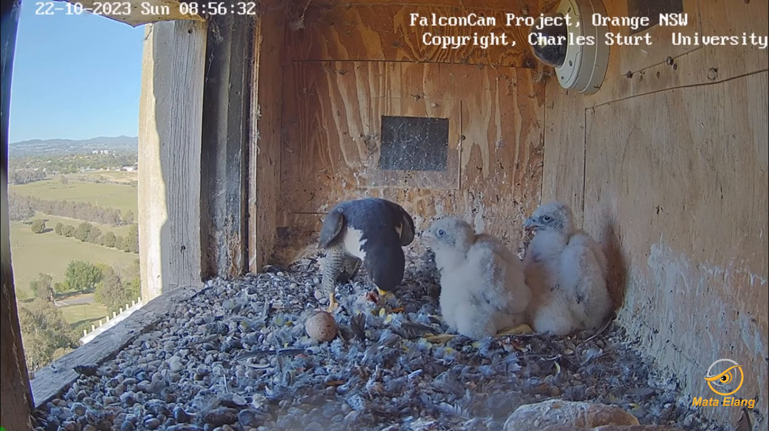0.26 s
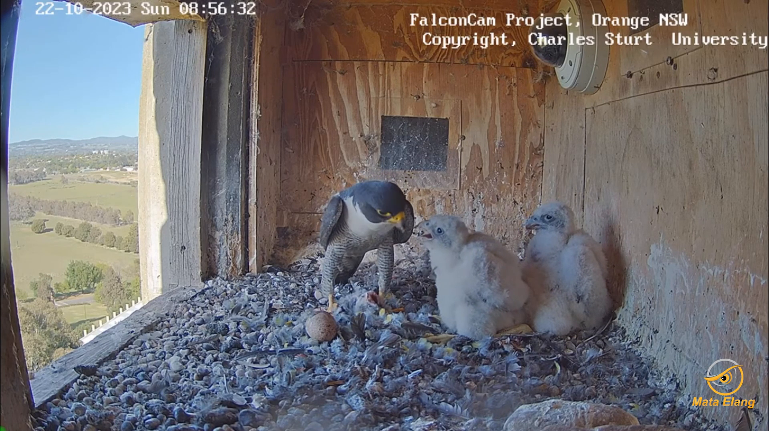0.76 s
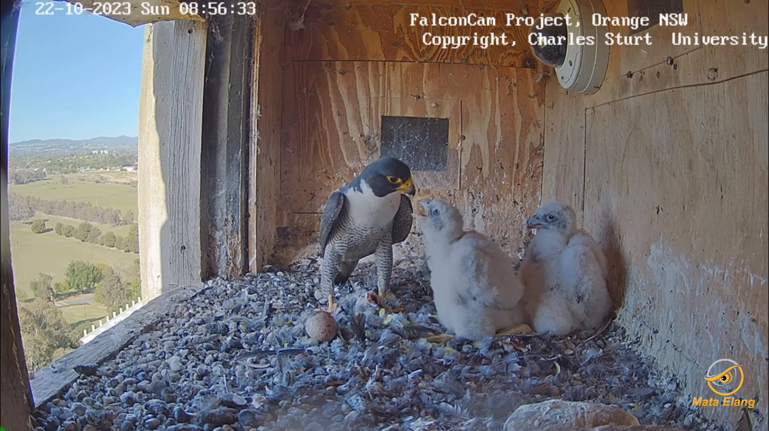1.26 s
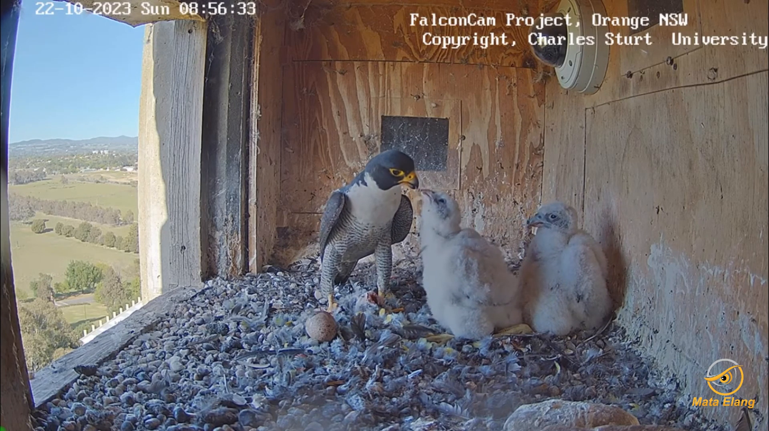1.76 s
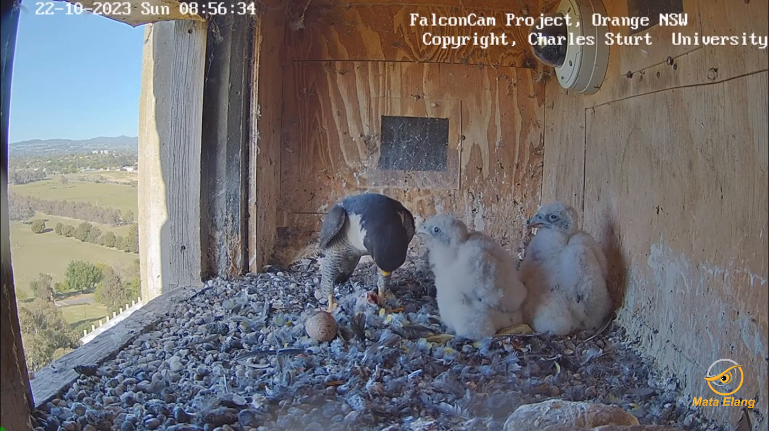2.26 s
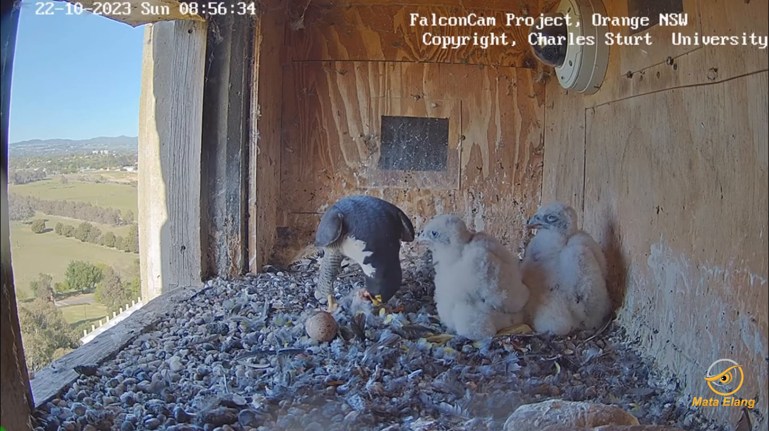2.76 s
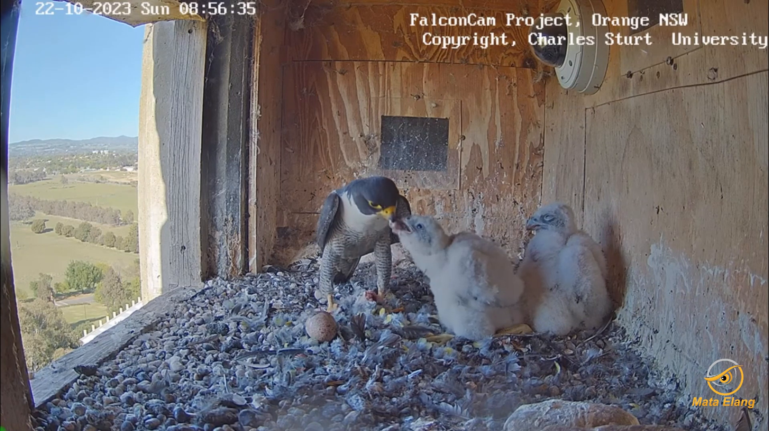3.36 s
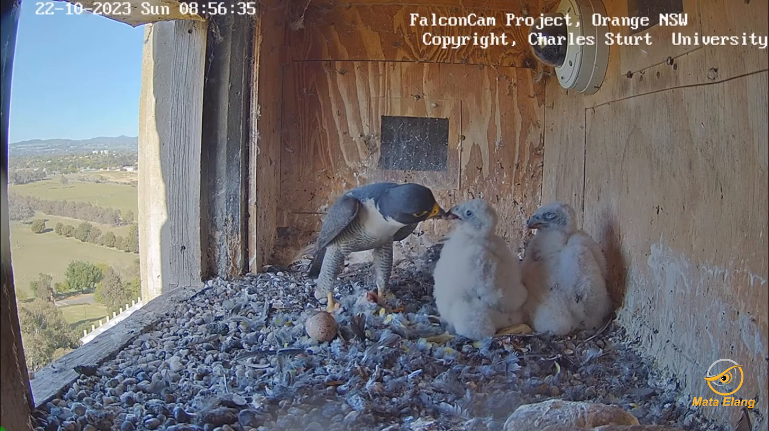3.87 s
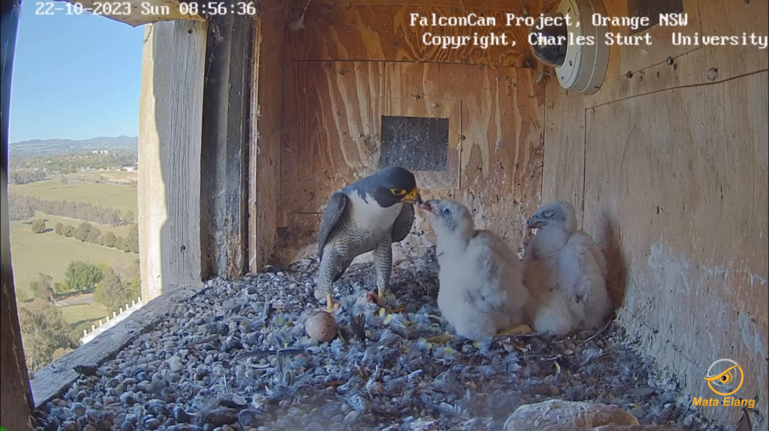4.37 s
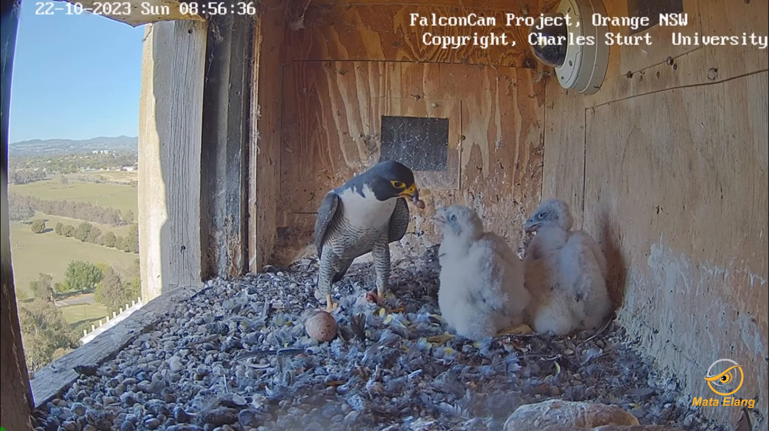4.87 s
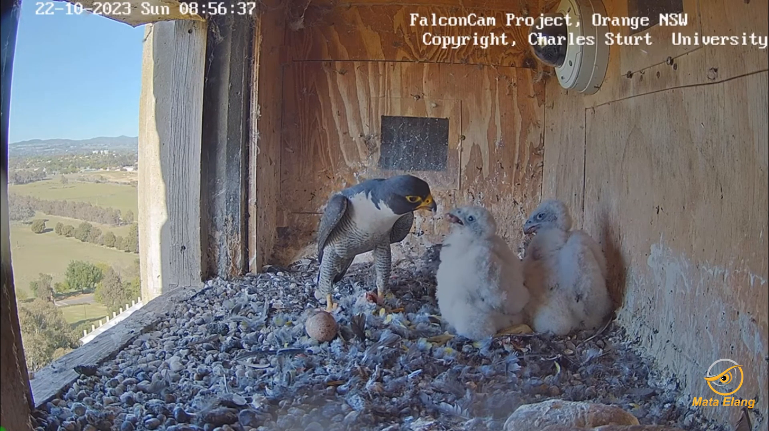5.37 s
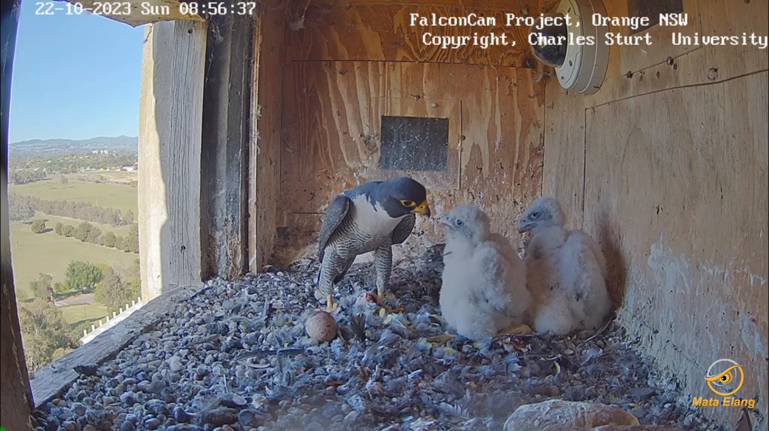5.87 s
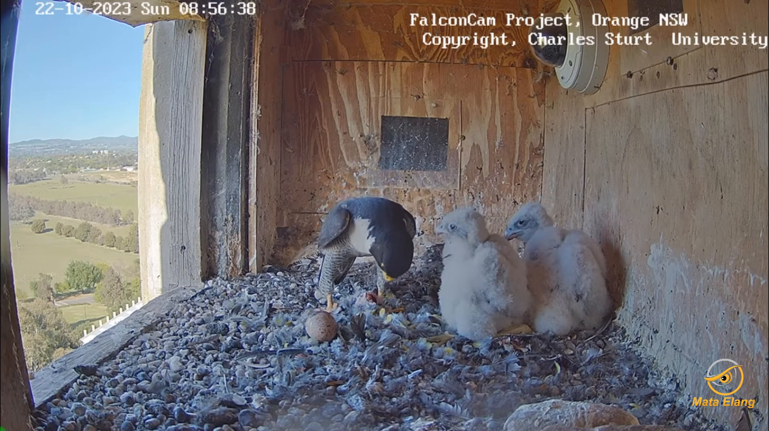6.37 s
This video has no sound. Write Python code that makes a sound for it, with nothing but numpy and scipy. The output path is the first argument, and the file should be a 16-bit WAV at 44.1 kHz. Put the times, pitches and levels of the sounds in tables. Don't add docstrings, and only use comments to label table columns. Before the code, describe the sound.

Falcon chicks beg inside a box on a hollow concrete tower. One deep thud sets the air rumbling, overlapped by a clear, nasal, whistling whine. Later calls grow busier: soft chups, bright yelps, a rough high squeal and a high unsteady whine, a sibling briefly overlapping. Beaks and claws tick on gravel. The slightly dull close microphone adds faint hiss and hum, and the calls ring on.

```python
import sys
import numpy as np
from scipy import signal
from scipy.fft import rfft, irfft
from scipy.io import wavfile
from scipy.ndimage import uniform_filter1d

SR = 44100
rng = np.random.default_rng(int(sys.argv[2]) if len(sys.argv) > 2 else 0)


def boost_factor(decibels):
    exponent = np.asarray(decibels, float) / 20
    return 10 ** exponent


def master_out(mix):
    frames = np.transpose(np.atleast_2d(mix))
    ceiling = np.clip(frames, -1, 1)
    pcm = np.round(ceiling * 32767).astype(np.int16)
    wavfile.write(sys.argv[1], SR, pcm)


N = 292206
SHIMMER_DB, FLUTTER_DB = 1.3, 2.2


def band(x, hz, width):
    return signal.lfilter(*signal.iirpeak(hz, hz / width, fs=SR), x)


def walk(rate, count=N):
    k = int(SR / rate)
    x = rng.standard_normal(count + 2 * k)
    x = uniform_filter1d(uniform_filter1d(x, k), k)[k:-k]
    return x / x.std()


def dying(t, t60):
    return np.exp(-np.log(1000) * t / t60)


def call(table, above_db, jitter, shimmer_db, breath_db):
    s, hz, *partials_db = np.transpose(table)
    at = np.arange(int(s[0] * SR), int(s[-1] * SR))
    count = len(at)
    closed_db = -18 * np.exp(-(s - s[0]) / 0.045)
    partials_db += [partials_db[-1] + db + closed_db for db in above_db]

    pitch = np.interp(at / SR, s, hz) * (1 + jitter * walk(158, count=SR)[:count])
    phase = 2 * np.pi * np.cumsum(pitch) / SR
    gains = [boost_factor(np.interp(at / SR, s, db)) for db in partials_db]
    tone = sum(g * np.sqrt(2) * np.sin((k + 1) * phase) for k, g in enumerate(gains))
    tone = tone * boost_factor(shimmer_db * walk(52, count=SR)[:count])

    air = band(band(rng.standard_normal(SR)[:count], 3500, 4200), 3100, 2000)
    breath = boost_factor(breath_db) * sum(gains) * air
    edges = np.clip(np.minimum(at - at[0], at[-1] - at) / (.008 * SR), 0, 1) ** 2
    out = np.zeros(N)
    out[at] = (tone + breath) * edges
    return out


def voiced(s, hz, db, partials_db, flutter_db):
    fine = np.append(np.arange(s[0], s[-1], .005), s[-1])
    at = ((fine - s[0]) * SR).astype(int)
    levels = []
    for k, partial_db in enumerate(partials_db):
        flutter = flutter_db * min(k + 1, 2) / 2 * walk(18, count=SR)[at]
        levels.append(np.interp(fine, s, db + partial_db) + flutter)
    return np.transpose([fine, np.interp(fine, s, hz), *levels])


def whine(curve, shut_db, open_db, top_db, rough):
    s, hz, db, beak = np.transpose(curve)
    db5, db6, db7 = top_db
    jitter, breath_db = rough
    partials_db = [shut + beak * (wide - shut) for shut, wide in zip(shut_db, open_db)]
    table = voiced(s, hz, db, partials_db, FLUTTER_DB)
    db7 = db7 + .9 * np.interp(table[:, 0], s, db - db.max())
    return call(table, (db5, db6, db7, db7), jitter, SHIMMER_DB, breath_db)


# (time [s], pitch [Hz], level [dB], beak opening [0-1])
WHINE_CURVES = [
    [(.762, 1014, -46, 0.2), (.78, 1135, -38, 0.64), (.835, 1061, -33.5, 0), (.92, 1102, -31.5, 0.07),
     (1.0, 1085, -28.5, 0.9), (1.34, 1084, -29.5, 0.54), (1.44, 1050, -26.5, 1), (1.55, 1031, -33.5, 0.86),
     (1.575, 958, -33.5, 0.4)],
    [(3.283, 1077, -38.5, 0.4), (3.325, 1172, -31, 0.8), (3.37, 1187, -24.5, 1), (3.40, 1233, -30, 0.4),
     (3.435, 1196, -34.5, 0.66), (3.52, 1147, -34.5, 1), (3.57, 1106, -36, .9), (3.605, 1130, -35, 0),
     (3.63, 1017, -35.5, .3)],
    [(4.994, 1143, -26, 0.77), (5.06, 1309, -34.5, 1), (5.085, 1250, -27.5, 0.96),
     (5.18, 1239, -33.5, 0.74), (5.23, 1320, -27.5, 0), (5.285, 1350, -27.5, 0.1),
     (5.315, 1170, -34.5, 0.01), (5.335, 1335, -36, 0.05), (5.39, 1380, -42, 0.2)],
]
# (time [s], pitch [Hz], level [dB], beak opening [0-1])
YAP_CURVE = [(4.081, 1065, -35.5, .5), (4.101, 1081, -32.5, 0.24), (4.12, 1147, -26.5, 0.9),
             (4.14, 1106, -32, 0.55), (4.161, 1151, -33.5, 0.08), (4.181, 1111, -39, 0)]
BEAK_SHUT = [(-13.5, -2, -6, -1), (-11, 2.5, -12, -9), (-34, -3, -22, -22.5), (-12, -0.5, -3, -3.5)]
BEAK_OPEN = [(-15.5, -7, 0, -11.5), (-15.5, -10, 0.0081, -8.5), (-12, -3.5, 0, -7.5),
             (-14, -9, 0.0057, -14.5)]
# (partial 5 [dB], partial 6 [dB], partials 7-8 [dB])
TOP_PARTIALS = [(-15.5, -32, -28), (-7, -24, 4), (-24, -7, -18), (-34, -36, -30)]
# (pitch jitter [share], breath [dB])
ROUGHNESS = [(.004, -25), (.005, -23), (.006, -20), (.0055, -18)]


def whines():
    voices = zip(WHINE_CURVES + [YAP_CURVE], BEAK_SHUT, BEAK_OPEN, TOP_PARTIALS, ROUGHNESS)
    return sum(whine(*voice) for voice in voices)


# (time [s], pitch [Hz], level [dB])
SQUEAL_CURVE = [(4.308, 2243, -33), (4.341, 2877, -28.5), (4.40, 3077, -27.5), (4.445, 2834, -28),
                (4.486, 2874, -28.5), (4.50, 2830, -40), (4.52, 2747, -36), (4.555, 2598, -33),
                (4.588, 1780, -48.5)]


def squeal():
    s, hz, db = np.transpose(SQUEAL_CURVE)
    second_db = -15 - 9 * (hz - 2800) / 1000
    second_db = second_db - 22 * np.exp(-(s - s[0]) / .02)
    table = voiced(s, hz, db, (0, second_db), FLUTTER_DB)
    return call(table, (), jitter=0.0058, shimmer_db=3.5, breath_db=-14.5)


def short(rows, partials_db, top_db, sag_db, jitter, breath_db):
    out = 0
    for s, length, db, first_hz, last_hz in rows:
        times = s + np.array([0, 0.01, length])
        hz = np.interp(times, times[::2], [first_hz, last_hz])
        levels_db = db + np.array([-12.5, 0, sag_db])
        table = voiced(times, hz, levels_db, partials_db, FLUTTER_DB / 2)
        out = out + call(table, top_db, jitter, SHIMMER_DB, breath_db)
    return out


# (time [s], length [s], level [dB], first pitch [Hz], last pitch [Hz])
YELP_CALLS = [
    (2.443, 0.045, -38.5, 1154, 1127),
    (3.017, 0.065, -38.5, 1087, 1246),
    (4.042, 0.038, -29.5, 1070, 1240),
    (4.928, 0.069, -32.5, 1044, 1241),
]
# (time [s], length [s], level [dB], first pitch [Hz], last pitch [Hz])
CHUP_CALLS = [
    (2.485, 0.067, -43.5, 1129, 1147),
    (3.078, 0.083, -41, 1067, 967),
    (3.70, 0.069, -36.5, 1030, 1115),
    (3.793, 0.038, -33.5, 1108, 1078),
]
# (time [s], length [s], level [dB], first pitch [Hz], last pitch [Hz])
SIBLING_CALLS = [
    (3.443, .087, -34, 1295, 1224),
    (5.085, .075, -35, 1311, 1274),
]
# (time [s], length [s], level [dB], first pitch [Hz], last pitch [Hz])
FAR_PEEPS = [
    (.195, 0.12, -61, 747, 743),
    (.46, 0.095, -67.5, 762, 760),
    (2.33, 0.09, -53.5, 1762, 1738),
]
# (partial 5 [dB], partial 6 [dB], partials 7-8 [dB])
SHORT_TOPS = (-20, -34, -47.5)


def short_calls():
    top_db = (*SHORT_TOPS, SHORT_TOPS[-1])
    yelps = short(YELP_CALLS, (-6, -6.5, -1.5, -23), top_db, sag_db=-1, jitter=.006, breath_db=-18)
    chups = short(CHUP_CALLS, (-20, -1, -24, -24), top_db, sag_db=-12.5, jitter=0.0079, breath_db=-20)
    peeps = short(FAR_PEEPS, (-3.5, -19), (), sag_db=6.5, jitter=0.0026, breath_db=-23)
    sibling = 0
    for row, partials_db in zip(SIBLING_CALLS, [(-23.5, -2, -5.5, -2), (-28, -7.5, -1.5, -13)]):
        sibling = sibling + short([row], partials_db, top_db, sag_db=-3, jitter=.009, breath_db=-18)
    return yelps + chups + sibling + peeps


# (time [s], peak level [dB], ring [Hz], 60 dB fade [s])
TICK_EVENTS = [
    (0.608, -50, 563, 0.053),
    (0.612, -51, 1590, 0.057),
    (1.905, -44, 600, 0.041),
    (2.401, -44, 3500, 0.069),
    (4.758, -36.5, 250, 0.026),
    (4.76, -73, 1485, 0.019),
    (5.067, -56, 2830, 0.03),
]


def ticks():
    out, t = np.zeros(N), np.arange(SR // 10) / SR
    for s, db, hz, t60 in TICK_EVENTS:
        burst = rng.standard_normal(len(t)) * dying(t, t60)
        crack = band(band(burst, hz, 2.2 * hz), hz, 2.2 * hz)
        start = int(s * SR)
        out[start:start + len(t)] += boost_factor(db) * crack / np.abs(crack).max()
    return out


# (time [s], length [s], level [dB], centre [Hz], width [Hz])
RUSTLE_EVENTS = [
    (5, 0.2, -33.5, 4500, 600),
    (2.44, 0.27, -56, 2200, 1100),
    (2.85, 0.072, -59.5, 4000, 2100),
    (1.9, 1, -56.5, 364, 37),
    (0.64, 0.76, -39, 170, 19),
    (4.25, 0.45, -54.5, 480, 110),
    (5.2, 0.32, -47.5, 2220, 570),
    (5.9, .7, -69, 4540, 910),
    (2.7, 0.29, -62, 2090, 380),
]


def rustles():
    out = np.zeros(N)
    for s, length, db, hz, width in RUSTLE_EVENTS:
        at, count = int(s * SR), int(length * SR)
        noise = band(band(rng.standard_normal(SR)[:count], hz, width), hz, width)
        grain = boost_factor(db + 3.0 * walk(51, count=SR)[:count])
        out[at:at + count] += grain * noise / noise.std() * np.hanning(count)
    return out


# (centre [Hz], 60 dB fade [s], level [dB])
SHAFT_ECHO = [(514, 3.1, -11), (1120, 1.74, -2), (2084, 1.4, 2), (2970, 1.14, 1), (4390, 1.14, 0),
              (5530, 0.18, -10.5)]


def shaft(dry, near_db, box_db, wet_db):
    t = np.arange(2 * SR) / SR
    tail = 0
    for hz, t60, db in SHAFT_ECHO:
        tail = tail + boost_factor(db) * band(rng.standard_normal(len(t)), hz, 0.33 * hz) * dying(t, t60)
    tail *= np.clip((t - .008) / 0.026, 0, 1)
    box = rng.standard_normal(len(t)) * dying(t, 0.28)
    response = boost_factor(wet_db) * tail / np.linalg.norm(tail) + boost_factor(box_db) * box / np.linalg.norm(box)
    near = signal.sosfilt(signal.butter(2, 4600, fs=SR, output="sos"), dry)
    near += .6 * band(dry, 3350, 900)
    return boost_factor(near_db) * near + signal.fftconvolve(dry, response)[:N]


def microphone(x):
    x = x - band(x, 1620, 420)
    dull = signal.sosfilt(signal.butter(8, 6350, fs=SR, output="sos"), x)
    return dull + boost_factor(-24) * x


# (time [s], opening [0-1])
GATE_CURVE = [(0, 0), (.55, 0), (.9, 0.47), (1.3, 0.85), (1.8, 1), (2.4, 0.4), (3, 0.72), (3.5, 0.76),
              (3.9, .7), (4.4, 0.82), (4.8, 0.63), (5.3, 0.77), (5.9, 0.6), (6.63, 0.02)]


def gated(t, shut_db, open_db):
    return shut_db + open_db * np.interp(t, *np.transpose(GATE_CURVE))


def shaped(points):
    hz, db = np.transpose(points)
    grid = np.log(np.arange(N // 2 + 1) * SR / N + 1)
    gain = boost_factor(np.interp(grid, np.log(hz), db, left=db[0] - 21.5, right=db[-1] - 30.0))
    return irfft(rfft(rng.standard_normal(N)) * gain, N) * np.sqrt(SR / 2)


# (centre [Hz], width [Hz], level [dB])
SHAFT_MODES = [(161.3, 22, 3), (187.9, 11, -1), (250, 25, -6.5), (353, 24, -6), (434.5, 62, 2),
               (532, 80, -4.5)]


def rumble(t):
    since = np.maximum(t - .608, 0)
    crack_db = 3 * np.exp(-since / .03)
    rise = np.minimum(since / .004, 1) ** 2
    bang = rise * boost_factor(-32 - 12 * since + crack_db)
    draught = boost_factor(gated(t, shut_db=-59, open_db=7))

    modes = 0
    for hz, width, db in SHAFT_MODES:
        ring = band(band(rng.standard_normal(N), hz, 1.35 * width), hz, 1.35 * width)
        modes = modes + boost_factor(db) * ring / np.sqrt(width)
    wash = shaped([(60, -9.5), (150, 10.0), (550, 0.0), (750, -27), (1500, -36.5)])
    sound = modes / modes.std() + boost_factor(-1) * wash / wash.std()
    return sound / sound.std() * np.hypot(bang, draught) * boost_factor(0.73 * walk(10.0))


# (frequency [Hz], level [dB per Hz])
AIR_SPECTRUM = [(25, -95), (35, -86.5), (65, -86), (100, -78.5), (160, -79.5), (300, -84), (500, -88.5),
                (800, -97.5), (1200, -107), (1600, -103), (2200, -100), (3100, -96), (3800, -103),
                (5100, -102), (6400, -110)]
# (frequency [Hz], level [dB per Hz])
HISS_SPECTRUM = [(6000, -13), (7700, -12), (7900, -1), (10000, -2), (10200, -4), (12300, -5.5),
                 (12500, -10.5), (15700, -12.5)]


def background(t):
    hum_db = gated(t, shut_db=-51, open_db=5.5) + 1.2 * walk(20)
    hum = np.sqrt(2) * np.sin(2 * np.pi * 50 * t) * boost_factor(hum_db)
    air_db = gated(t, shut_db=-1, open_db=9) + 0.62 * walk(2.1)
    air = shaped(AIR_SPECTRUM) * boost_factor(air_db)
    hiss = shaped(HISS_SPECTRUM)
    hiss = hiss / hiss.std() * boost_factor(gated(t, shut_db=-67.5, open_db=4))
    return hum + air + hiss


def scene():
    t = np.arange(N) / SR
    chicks = whines() + squeal() + short_calls()
    nest = shaft(chicks + ticks() + rustles(), near_db=0, box_db=-7, wet_db=-8)
    return (microphone(nest) + rumble(t) + background(t))[None]


def low_pass(x):
    return signal.sosfilt(signal.butter(12, 15780, fs=SR, output="sos"), x)


def record(dry):
    return low_pass(dry)


dry = scene()
out = record(dry)
master_out(out)
```